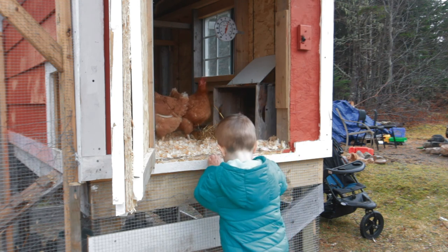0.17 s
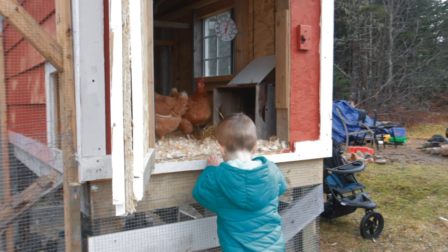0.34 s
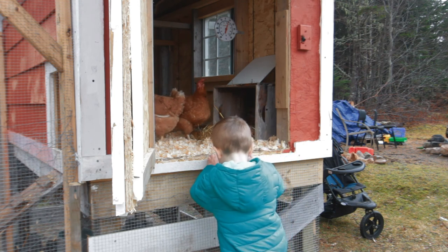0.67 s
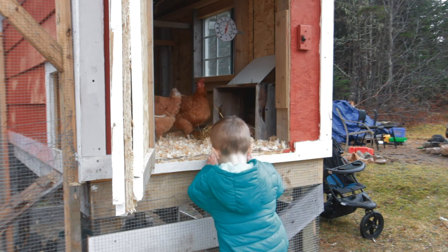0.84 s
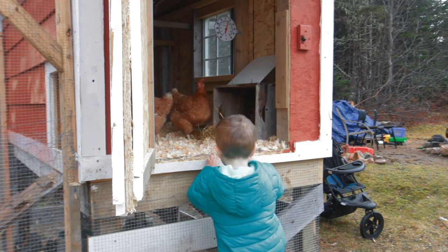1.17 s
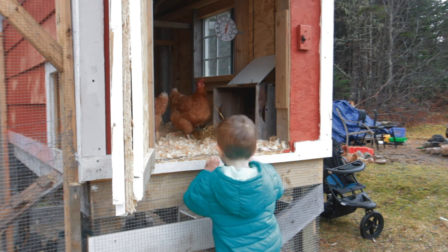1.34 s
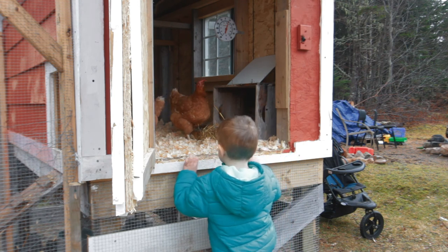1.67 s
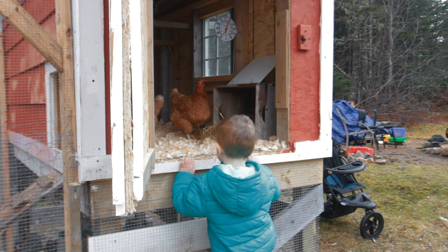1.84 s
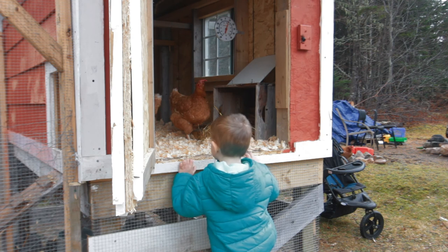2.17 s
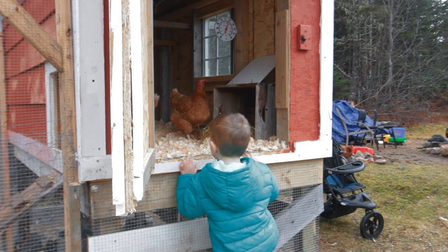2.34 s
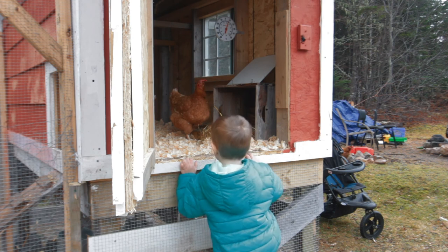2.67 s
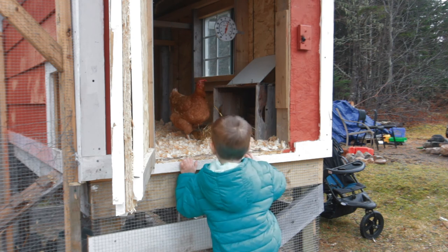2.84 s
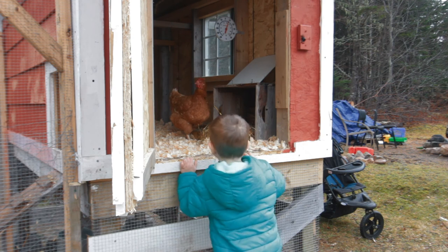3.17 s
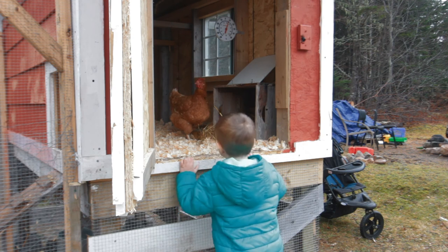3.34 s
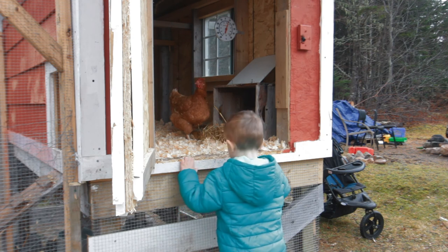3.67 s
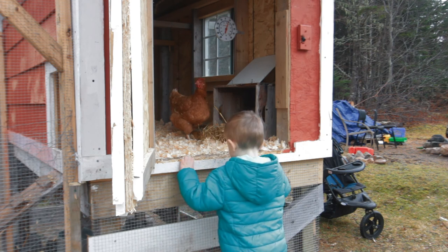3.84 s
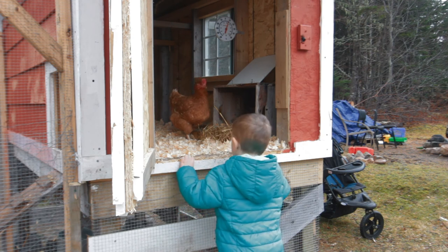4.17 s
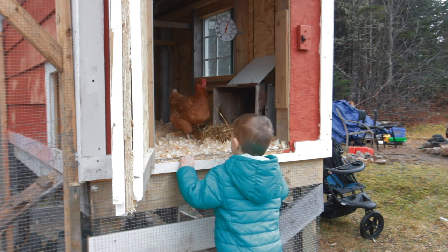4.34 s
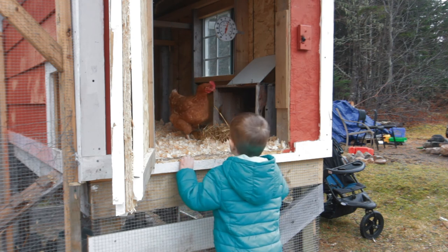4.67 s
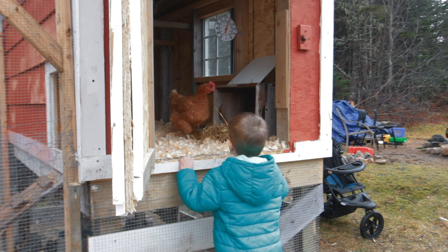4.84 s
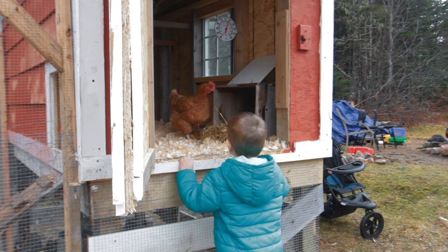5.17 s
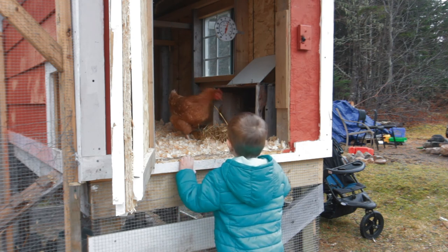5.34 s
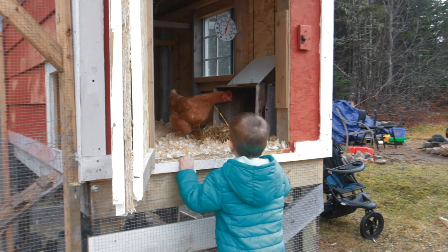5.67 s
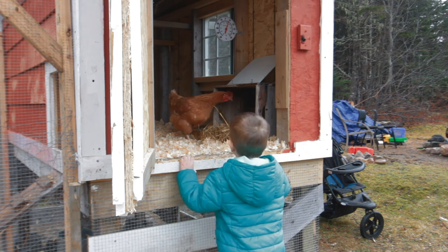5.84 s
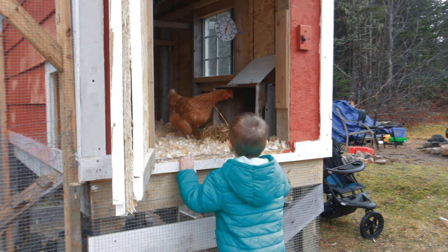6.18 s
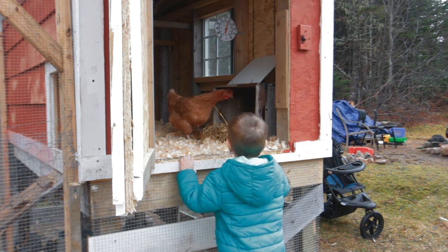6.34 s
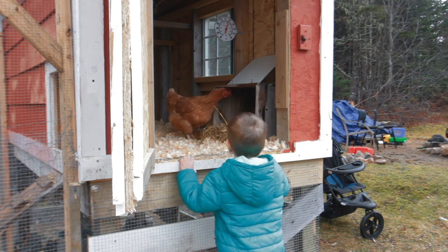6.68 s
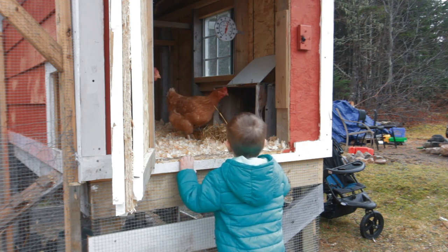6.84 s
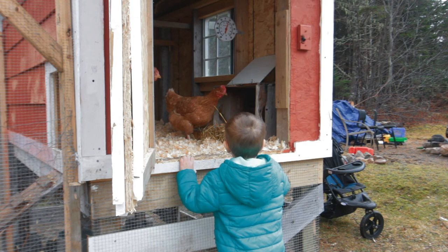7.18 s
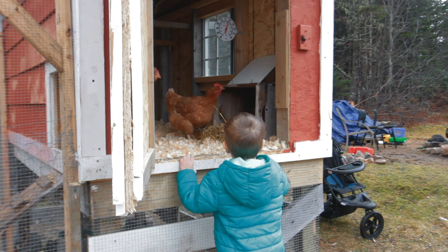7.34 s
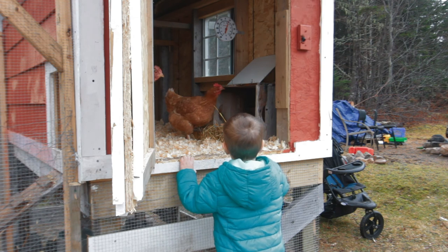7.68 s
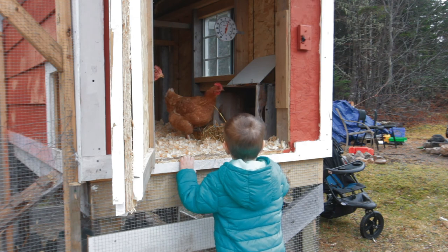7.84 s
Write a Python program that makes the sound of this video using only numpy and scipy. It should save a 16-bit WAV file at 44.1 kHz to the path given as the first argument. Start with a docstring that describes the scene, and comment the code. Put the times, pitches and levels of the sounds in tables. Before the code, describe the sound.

Close, loud hen clucks build to raspy squawks three times, then low clucks lead another run, over litter scratches, board thumps and faint outdoor air.

```python
"""The echo of a hen's squawk fades over quiet yard air and the stirring shavings of an open wooden coop.
Feet bump the boards; then come runs of short clucks, while another hen murmurs. The first runs end in a
harsh squawk, one of them by way of two whistling yelps; low clucks open a last run that has no squawk.
Calls are pulses ringing a throat, feet are noise ringing boards, litter is grains and narrow squeaks.
Near walls, a wall across the yard and the trees echo the calls."""
import sys
import numpy as np
from scipy import signal
from scipy.fft import rfft, irfft, next_fast_len
from scipy.io import wavfile
from scipy.ndimage import uniform_filter1d

SR = 44100
rng = np.random.default_rng(int(sys.argv[2]) if len(sys.argv) > 2 else 0)


def file_out(sig):
    """Save sig as 16-bit WAV at sys.argv[1]."""
    # one column per channel
    cols = np.atleast_2d(sig).T
    # limit, then scale
    lim = np.clip(cols, -1, 1)
    pcm = np.round(lim * 32767).astype(np.int16)
    wavfile.write(sys.argv[1], SR, pcm)


N = 353241
LEAD = SR // 2  # samples ahead of time zero, so that earlier calls can still echo
TOP_HZ = 15900  # upper limit of the harmonics and of the recorder


def amp(db):
    """Decibels to gain."""
    return 10 ** (np.asarray(db) / 20)


def unit(x):
    """Scale to rms 1."""
    return x / np.sqrt(np.mean(x ** 2) + 1e-18)


def add(track, start, sound):
    """Mix a sound into a track that begins LEAD samples before time zero."""
    i = max(int(start * SR) + LEAD, 0)
    part = sound[:max(len(track) - i, 0)]
    track[i:i + len(part)] += part


def wander(size, rate):
    """Random curve: straight lines between normal random values, rate of them a second."""
    at = np.arange(size) * rate / SR
    knots = np.arange(int(at[-1]) + 2)
    return np.interp(at, knots, rng.standard_normal(len(knots)))


def resonate(x, modes, size=1024):
    """Causal filter with one steep-sided peak for each mode; the ring is kept at the end."""
    f = np.arange(size // 2 + 1) * SR / size + 1
    hz, width, db = np.transpose(modes)[:, :, None]
    peaks = amp(db) / (1 + ((f * f - hz * hz) / (f * width)) ** 2)
    cepstrum = irfft(np.log(np.sum(peaks, axis=0) + 1e-4))
    # folding the cepstrum gives minimum phase: the ring follows the blow
    spectrum = np.exp(rfft(2 * cepstrum[:size // 2], size) - cepstrum[0])
    return signal.fftconvolve(x, irfft(spectrum))


def colour(x, points):
    """Shape a sound by a spectrum of (Hz, dB) points."""
    hz, db = np.transpose(points)
    size = next_fast_len(len(x))
    f = np.arange(size // 2 + 1) * SR / size + 1
    gain = amp(np.interp(np.log(f), np.log(hz), db))
    return irfft(rfft(x, size) * gain, size)[:len(x)]


def lowpass(x, hz, order=2):
    """Gentle low-pass."""
    return signal.sosfilt(signal.butter(order, min(hz, SR / 2 - 1), fs=SR, output="sos"), x)


def yard(level_db=-57.5, waver_db=2.5):
    """Quiet outdoor air: shaped noise whose level wavers."""
    # air spectrum: hz, density_db (per Hz)
    air_spectrum = [(18, -76), (30, -39), (179, 5.5), (473, 3), (512, -11.5), (569, -1.5), (1500, -2),
                    (1810, -3.5), (2410, -4), (2750, -8), (3580, -11), (5740, -11), (8980, -17.5),
                    (10800, -15.5), (16000, -26)]
    air = unit(colour(rng.standard_normal(N), air_spectrum))
    return amp(level_db + waver_db * wander(N, 17.0)) * air


def ramps(length, attack_s, release_s):
    """Time within a call, an onset falling 1 to 0 over the attack, an ending rising 0 to 1 at the close."""
    t = np.arange(int(length * SR)) / SR
    onset = np.clip(1 - t / attack_s, 0, 1)
    ending = np.clip(1 - (length - t) / release_s, 0, 1)
    return t, onset, ending


def register(t, after, lasts, flip_s):
    """Near 1 while the syrinx has flipped into its other way of vibrating, else near 0."""
    return (np.tanh((t - after) / flip_s) - np.tanh((t - after - lasts) / flip_s)) / 2


def beak(t, rough, stretch, settle_s, shake=0.013):
    """Mouth-resonance ratio: the beak starts off its rest opening and settles, shaking with the rasp."""
    return 1 + stretch * np.exp(-(t / settle_s) ** 2) + shake * rough * wander(len(t), 25)


def moving_throat(x, modes, gape, size=256):
    """A wider beak raises the mid-range mouth resonances by the ratio gape; those of the windpipe stay put."""
    hz, width, db = np.transpose(modes)
    reach = np.exp(-(np.log(hz / 2200) / .42) ** 2)  # how far each resonance follows the beak
    padded, out = np.pad(x, size), np.zeros(len(x) + SR // 10)
    # overlapping slices, each rung by the throat of its moment
    for i in range(0, len(x), size):
        piece = padded[i:i + 2 * size]
        piece = piece * signal.windows.hann(2 * size, sym=False)[:len(piece)]
        rung = resonate(piece, np.transpose([hz * gape[i] ** reach, width, db]))
        out[i:i + len(rung)] += rung
    return out[size:size + len(x)]


def voice(hz, db, rough, treble_db, gape, throat, doubling=0.55, closure=.13, edge_hz=1700):
    """Syrinx pulses ring the throat; uneven flapping scatters periods, frays harmonics and rasps the air."""
    size, rough = len(hz), np.clip(rough, 0, 1)
    jitter = .04 * wander(size, 400) + .028 * wander(size, 70)
    phase = 2 * np.pi * np.cumsum(hz * (1 + rough * jitter)) / SR
    pulses = np.zeros(size)
    for k in range(1, int(TOP_HZ / hz.mean()) + 1):
        fray = .75 * rough * (wander(size, 230) + 1j * wander(size, 230))
        # the head jerks about, so the short waves fade in and out
        sway_db = np.minimum(k * (.2 + rough / 2), 3.5) * wander(size, 50)
        # the membranes take a moment to close, which spreads each pulse
        harmonic = np.exp(1j * (k * phase + closure * k * k))
        pulses += amp(sway_db) * np.real((1 + fray) * harmonic)
    # roughness makes every other pulse stronger
    pulses = unit(pulses) * (1 + doubling * rough * np.cos(phase / 2))
    # air rasps once a cycle
    air = unit(rng.standard_normal(size) * (1 + .7 * np.cos(phase)))
    flutter = np.exp(.35 * rough * wander(size, 330))
    source = (pulses + .62 * rough * air) * flutter
    sound = moving_throat(source, throat, gape)
    # more pressure shuts the membranes harder and lifts the upper harmonics
    body = colour(sound, [(edge_hz * 0.42, 0), (edge_hz * 2.9, -20)])
    sound = body + amp(treble_db) * (sound - body)
    # level the running loudness, then impose the call's own swell and short end fades
    loudness = np.sqrt(uniform_filter1d(sound ** 2, size=700) + 1e-12)
    fades = signal.windows.tukey(size, min(0.0041 * SR / size, 1))
    return sound / loudness * amp(db) * fades


def squawks(onset_db=-11, ending_db=-12, push_db=7, ending_treble_db=-12, ending_rough=.6):
    """A sudden rasp scoops up, locks into a clearer tone, brightens in a last push, then frays and dies."""
    # squawks: start_s, length_s, release_s, pitch_hz, drift_hz_per_s, level_db, treble_db, roughness (0-1),
    # clear_after_s, clear_lasts_s, clear_roughness (0-1)
    squawk_calls = [(-.3, 0.22, 0.085, 328.8, -51.5, -11, -1, 0.76, 0.067, .05, 0.39),
                    (1.571, 0.25, 0.096, 372.5, -220, -13, -12.5, .7, 0.12, 0.036, 0.31),
                    (3.952, 0.27, 0.071, 309.1, 140, -13, -12.5, 0.54, 0.0197, 0.0542, 0.07),
                    (6.090, 0.2, .038, 314.1, 94.5, -13, -12.5, 0.47, 0.025, 0.116, 0.03)]
    # throat resonances: centre_hz, width_hz, level_db
    squawk_throat = [(639, 183, -13.5), (1073, 356, 2.5), (1278, 144, 1), (2030, 140, -13),
                     (2212, 163, -1.5), (3353, 83, -21), (3820, 480, -13), (4430, 1200, -24),
                     (5560, 610, -17.5), (7710, 1150, -22.5), (10000, 390, -28), (12000, 10000, -33)]
    attack_s, flip_s, push_s = 0.0093, .006, 0.033
    scoop, scoop_s, droop = .1, .018, .04  # flat start (share of pitch), its recovery, flat end
    sag_db_per_s = -10  # breath runs down
    out = np.zeros(LEAD + N)
    for (start, length, release_s, hz, drift, db, treble_db, rough,
         after, lasts, clear_rough) in squawk_calls:
        t, onset, ending = ramps(length, attack_s, release_s)
        clear = register(t, after, lasts, flip_s)
        push = np.exp(-((t - length + release_s) / push_s) ** 2)
        pitch = (hz + drift * t) * (1 - scoop * np.exp(-t / scoop_s) - droop * ending ** 2)
        level = db + sag_db_per_s * t + onset_db * onset + ending_db * ending
        harsh = rough + onset / 2 + ending_rough * np.sqrt(ending)
        rasp = np.clip(clear * clear_rough + (1 - clear) * harsh, 0, 1)
        treble = treble_db + push_db * push + ending_treble_db * ending
        gape = beak(t, rasp, stretch=0.16, settle_s=0.04)  # flies open, then settles
        add(out, start, voice(pitch, level, rasp, treble, gape, squawk_throat))
    return out


def crackle(size, grain_rate=700):
    """Dry shavings: dense grains of very unequal size, each in its own part of the spectrum."""
    # shavings spectrum: hz, density_db (per Hz)
    shavings_spectrum = [(100, -14.5), (300, -5), (1000, 3), (2500, -0.5), (5000, -5.5), (8000, -9),
                         (12000, -11.5), (16000, -24.5)]
    out = np.zeros(size)
    for hz in np.geomspace(200, 12800, 7):
        grain_db = 4 * wander(size, grain_rate) + 2.5 * wander(size, 70)
        grains = rng.standard_normal(size) * amp(grain_db)
        out += colour(grains, [(hz / 4, -40), (hz / 2, -12), (hz, 0), (hz * 2, -12), (hz * 4, -40)])
    return unit(colour(out, shavings_spectrum))


def rustle(stir_db=-67, flutter_db=3.5):
    """Each scratch swells and dies away over a faint, constant stirring of the shavings."""
    # scratches: middle_s, length_s, level_db
    scratches = [(0.863, .14, -59), (1.207, 1, -57), (2, 0.4, -42), (2.247, 0.21, -56), (2.48, .06, -68),
                 (2.719, 0.18, -50.5), (2.85, 0.2, -45), (3.058, 0.37, -39.5), (3.29, 0.21, -36.5),
                 (3.395, 0.27, -50), (3.742, 0.16, -55), (4.731, 0.12, -56), (4.908, 0.09, -57.5),
                 (5.088, 0.11, -57), (5.36, 0.13, -51), (5.487, 0.11, -43), (5.594, .14, -51.5),
                 (6.434, 0.34, -53), (6.901, 0.18, -49), (7.203, 0.13, -50), (7.546, .12, -52.5),
                 (7.796, 0.1, -52), (7.989, 0.088, -45)]
    effort = np.full(LEAD + N, amp(stir_db))
    for middle, length, db in scratches:
        add(effort, middle - length / 2, amp(db) * np.hanning(int(length * SR)))
    return effort * amp(flutter_db * wander(LEAD + N, 45)) * crackle(LEAD + N)


def bumps(rise_s=0.0077, boom_db=12):
    """A scuffing push rings the floor boards and crunches the litter on them."""
    # foot bumps: start_s, level_db, push_decay_s, boom_hz, crunch_db
    foot_bumps = [(0.41, -53.5, 0.03, 191, -7), (0.869, -44, 0.015, 330, -13.5),
                  (2.912, -44, 0.019, 220, -14), (2.974, -29, 0.061, 383, -14),
                  (3.024, -40, 0.086, 537, -22), (3.24, -30, 0.013, 207, 2),
                  (4.293, -34.5, 0.022, 270, -9.5), (4.697, -40.5, 0.019, 296, -21),
                  (4.805, -56, 0.0037, 377, 11), (5.025, -41.5, 0.026, 420, -32),
                  (5.054, -32.5, 0.012, 250, -26), (5.342, -26, 0.021, 220, -33),
                  (5.369, -29.5, 0.042, 800, -8), (5.434, -28, 0.0092, 273, -8),
                  (5.626, -40.5, 0.12, 262, -16), (6.467, -33.5, 0.0072, 370, -25),
                  (6.56, -26.5, 0.0035, 516, -21), (6.575, -39.5, 0.042, 176, -6.5),
                  (6.757, -38.5, 0.0025, 285, -15), (6.848, -48, 0.029, 200, -3),
                  (7.956, -44.5, 0.0094, 267, -22)]
    # modes of the coop floor: centre_hz, width_hz, level_db
    boards = [(150, 115, -3.5), (233, 33, -1.5), (302, 31, -8), (460, 12, 2), (597, 65, -6),
              (820, 390, -30), (1225, 1500, 10)]
    out = np.zeros(LEAD + N)
    t = np.arange(SR // 4) / SR
    for start, db, length, hz, crunch_db in foot_bumps:
        push = (1 - np.exp(-t / rise_s)) * np.exp(-t / length)
        boom = [(hz / 2, -boom_db), (hz, 0), (hz * 2, -boom_db), (hz * 4, -3 * boom_db)]
        force = colour(rng.standard_normal(len(t)), boom)
        ringing = resonate(force * push, boards, size=4096)[:len(t)]
        wood = unit(ringing) * np.sqrt(np.mean(push ** 2))
        crunch = lowpass(push * crackle(len(t)), hz=7000, order=1)
        add(out, start, amp(db) * (wood + amp(crunch_db) * crunch) / push.max())
    return out


def clucks(table, throat, follow=0.26, swell_shape=1.84, onset_db=-27, ending_db=-15,
           onset_treble_db=-25, ending_treble_db=-13, onset_rough=1.15, ending_rough=0.49):
    """Each cluck starts gruff and flat, scoops up to its note and dulls; the throat tightens with the pitch."""
    attack_s, release_s = 0.0257, 0.026
    scoop, droop = 0.2585, 0.056  # share of the pitch missing at the start and at the end
    out = np.zeros(LEAD + N)
    usual_hz = np.median([row[2] for row in table])
    for start, length, hz, db, rough, treble_db in table:
        t, onset, ending = ramps(length, attack_s, release_s)
        pitch = hz * (1 - scoop * onset ** 2 - droop * ending ** 2)
        level = db + onset_db * onset ** swell_shape + ending_db * ending ** swell_shape
        treble = treble_db + onset_treble_db * onset ** 2 + ending_treble_db * ending ** 2
        rasp = rough + onset_rough * onset + ending_rough * ending ** 2
        gape = (pitch / usual_hz) ** follow
        add(out, start, voice(pitch, level, rasp, treble, gape, throat))
    return out


def murmur(octave_db=-26, fade_s=0.031, fade_db=-18):
    """With the beak shut each note is almost a pure tone that fades in, glides and fades out."""
    # a second hen's soft notes: start_s, length_s, first_pitch_hz, last_pitch_hz, level_db
    soft_notes = [(.92, 0.1, 492, 554, -59), (1.06, 0.11, 467, 383, -38.5), (1.172, 0.11, 418, 375, -37.5)]
    out = np.zeros(LEAD + N)
    for start, length, first_hz, last_hz, db in soft_notes:
        t, onset, ending = ramps(length, fade_s, fade_s)
        phase = 2 * np.pi * np.cumsum(np.linspace(first_hz, last_hz, len(t))) / SR
        tone = unit(np.sin(phase) + amp(octave_db) * np.sin(2 * phase))
        add(out, start, amp(db + fade_db * (onset + ending) ** 2) * tone)
    return out


def squeaks(width_share=0.23):
    """Dry surfaces in the litter catch and slip: thin squeaks and ticks, each in one narrow band."""
    # litter squeaks: start_s, centre_hz, level_db, length_s
    litter_squeaks = [(2.53, 5570, -60, 0.011), (2.866, 3100, -46, 0.014), (4.806, 6960, -59, .008),
                      (5.34, 1910, -30, 0.0065), (5.359, 5000, -46.5, 0.031), (5.414, 4900, -39.5, 0.012),
                      (5.478, 11000, -45.5, 0.02), (5.479, 7300, -49, .016), (5.498, 10000, -59, .012)]
    out = np.zeros(LEAD + N)
    for start, hz, db, length in litter_squeaks:
        size = int(length * SR)
        slip = resonate(rng.standard_normal(size), [(hz, hz * width_share, 0)])[:size]
        add(out, start, amp(db) * unit(slip * np.hanning(size)))
    return out


def whistle(hz, overtone):
    """The windpipe rings on the second harmonic; in the high register the fifth joins it."""
    phase = 2 * np.pi * np.cumsum(hz) / SR
    return unit(np.sin(2 * phase) + overtone * np.sin(5 * phase))


def yelps(onset_db=-20, ending_db=-19, treble_db=-6, onset_treble_db=-14, ending_treble_db=-14,
          leap_db=-11, fall_db=-7, rough_before=0.62, rough_leap=.12, rough_after=.3):
    """A rough, rising cluck breaks into a higher, whistling note; the whistle stays as the pitch drops back."""
    # yelps: start_s, length_s, pitch_hz, level_db, leap_after_s, leap_lasts_s, leap_pitch_hz,
    # whistle_db, overtone_db
    yelp_calls = [(5.709, 0.098, 525.6, -9, .045, 0.026, 629.3, -9.5, -26),
                  (5.952, 0.1264, 531.5, -11, .058, .04, 655.3, -11.5, -14.5)]
    # throat resonances: centre_hz, width_hz, level_db
    yelp_throat = [(506, 1800, -21.5), (936, 374, 6.5), (1290, 81, 1.5), (1990, 200, -2), (2395, 240, -8.5),
                   (3300, 330, -8.5), (4000, 450, -14.5), (5710, 760, -17.5), (7660, 690, -24.5),
                   (10100, 1100, -30.5), (13300, 3600, -36)]
    attack_s, release_s, flip_s = 0.046, 0.02, 0.00706
    scoop, scoop_s, droop = 0.14, 0.034, 0.027  # flat start (share of pitch), its recovery, flat end
    out = np.zeros(LEAD + N)
    for start, length, hz, db, after, lasts, leap_hz, whistle_db, overtone_db in yelp_calls:
        t, onset, ending = ramps(length, attack_s, release_s)
        high = register(t, after, lasts, flip_s)
        whistling = register(t, after, length, flip_s) ** 2
        low_pitch = hz * (1 - scoop * np.exp(-t / scoop_s) - droop * ending ** 2)
        pitch = high * leap_hz + (1 - high) * low_pitch
        level = db + onset_db * onset ** 2 + ending_db * ending ** 2
        level += leap_db * high ** 2 + fall_db * whistling
        low_rasp = np.where(t < after + lasts / 2, rough_before, rough_after)
        rasp = high * rough_leap + (1 - high) * low_rasp
        treble = treble_db + onset_treble_db * onset ** 2 + ending_treble_db * ending
        gape = beak(t, rasp, stretch=-0.069, settle_s=0.025)  # starts narrower
        add(out, start, voice(pitch, level, rasp, treble, gape, yelp_throat))
        ring = whistle(pitch, amp(overtone_db) * high ** 2)
        add(out, start, amp(whistle_db) * whistling * (1 - ending ** 2) * ring)
    return out


def burst(delay, decay, top_hz):
    """A noise cloud of reflections that arrives after delay and dies away, set to one energy, then dulled."""
    t = np.arange(SR) / SR
    shape = (t >= delay) * np.exp(-np.abs(t - delay) / decay)
    cloud = rng.standard_normal(SR) * shape / np.sqrt(np.sum(shape ** 2))
    return lowpass(cloud, top_hz, order=1)


def coop(x, scatter_db=-3, beam_hz=3200):
    """Treble leaves the beak in a beam and glances off the near walls."""
    scatter = colour(burst(0.0018, 0.0068, 15000), [(beam_hz / 2, -24), (beam_hz, 0)])
    return x + amp(scatter_db) * signal.fftconvolve(x, scatter)[:len(x)]


def surroundings(x, echo_db, tail_db, far_db, tail_t60=0.6, far_t60=0.94,
                 echo_hz=7000, tail_hz=5000, far_hz=1800):
    """A sound with smeared echoes from the coop and a wall, then a dull tail from the yard and the trees."""
    # echoes: delay_s, relative_db (echo_db is added), smear_s
    echoes = [(.006, -8.5, 0.0013), (.024, -11.5, 0.011), (0.057, -13, .012)]
    response = sum(amp(db + echo_db) * burst(delay, smear, echo_hz) for delay, db, smear in echoes)
    # a 60 dB decay time divided by log(1000) is the time constant
    response += amp(tail_db) * burst(0.056, tail_t60 / np.log(1000), tail_hz)
    response += amp(far_db) * burst(0.3, far_t60 / np.log(1000), far_hz)
    return x + signal.fftconvolve(x, response)[:len(x)]


def scene():
    """All sources and their echoes at one microphone."""
    # clucks, then low ones with the beak nearly shut:
    # start_s, length_s, pitch_hz, level_db, roughness (0-1), treble_db
    cluck_calls = [(.992, 0.059, 508.3, -16.5, 0.23, -10), (1.212, 0.059, 498, -14.5, 0.08, -7),
                   (1.428, 0.061, 497.8, -15, 0.13, -3.5), (1.906, 0.062, 510.4, -13.5, 0.18, -11),
                   (2.616, 0.052, 462, -21.5, 0.83, -9.5), (2.853, 0.06, 486, -17.5, 0.48, -11),
                   (3.100, 0.06, 481, -17.5, 0.11, -5), (3.338, 0.057, 463.2, -18.5, 0.46, -6.5),
                   (3.597, 0.055, 473.3, -16.5, 0.22, 1.5), (3.833, 0.052, 481, -14.5, 0.16, 3),
                   (5.257, 0.048, 490.8, -16, 0.16, -7.5), (5.486, 0.061, 482, -17, 0.3, -1.5),
                   (7.108, .054, 468.7, -18, 0.6, -5.5), (7.434, 0.053, 473.7, -16, 0.46, -1),
                   (7.670, 0.056, 470.2, -16.5, 0.15, -1), (7.911, 0.054, 476, -15.5, 0.34, 2)]
    low_cluck_calls = [(.85, 0.054, 405, -49.5, 0.54, -5), (6.374, 0.053, 386.4, -23, 0.33, -0.5),
                       (6.586, 0.049, 374.5, -24, 0.43, 4), (6.830, 0.043, 386.6, -23, 0.7, -1)]
    # throat resonances of each: centre_hz, width_hz, level_db
    cluck_throat = [(454, 36, -12.5), (800, 270, -14.5), (1002, 380, 0.5), (1173, 220, -7), (1414, 51, -14),
                    (1879, 190, -7), (2613, 200, -14.5), (2918, 130, -15.5), (4040, 560, -26),
                    (4900, 400, -40), (6140, 380, -38.5), (8030, 430, -46), (10200, 670, -46.5),
                    (14000, 2300, -47)]
    low_throat = [(547, 71, -2), (785, 380, 14), (1020, 290, 8), (1820, 380, -3.5), (3260, 1200, -34),
                  (5950, 2300, -35), (12800, 5400, -41)]
    cackle = clucks(cluck_calls, cluck_throat) + clucks(low_cluck_calls, low_throat)
    short = coop(cackle) + murmur()
    floor = bumps() + rustle() + squeaks()
    mix = surroundings(coop(squawks()), echo_db=1.0, tail_db=-15.0, far_db=-35.5)
    mix += surroundings(floor, echo_db=-6.5, tail_db=-27.5, far_db=-27.0)
    mix += surroundings(short, echo_db=0, tail_db=-25.5, far_db=-43.0)
    mix += surroundings(coop(yelps()), echo_db=-1.5, tail_db=-19.5, far_db=-35)
    return (mix[LEAD:] + yard())[None]


def record(dry, ceiling=.72):
    """The recorder rounds the highest peaks, thins the bass and cuts the top."""
    rounded = dry / (1 + (dry / ceiling) ** 6) ** (1 / 6)
    thin = signal.sosfilt(signal.butter(3, 110, "high", fs=SR, output="sos"), rounded)
    return signal.sosfilt(signal.ellip(10, .2, 80, TOP_HZ, fs=SR, output="sos"), thin)


dry = scene()
out = record(dry)
file_out(out)
```